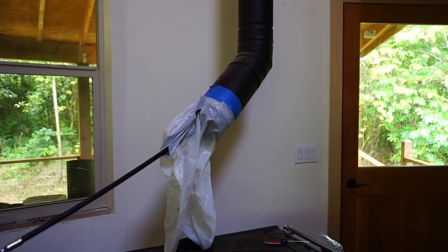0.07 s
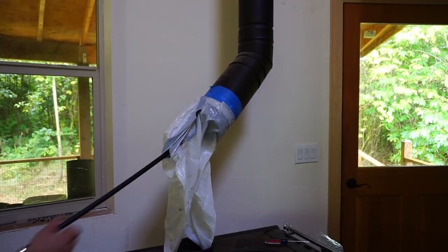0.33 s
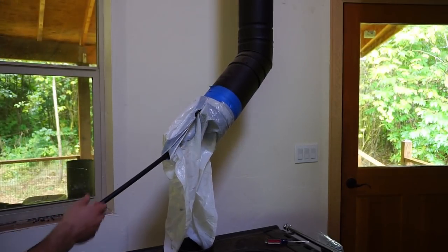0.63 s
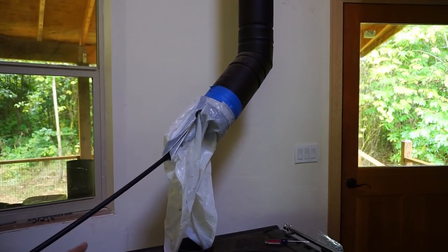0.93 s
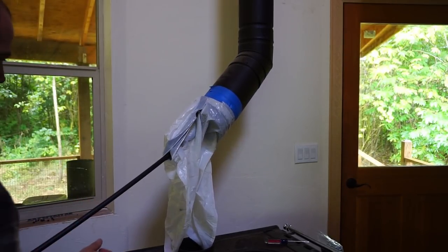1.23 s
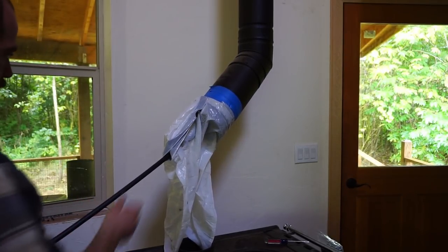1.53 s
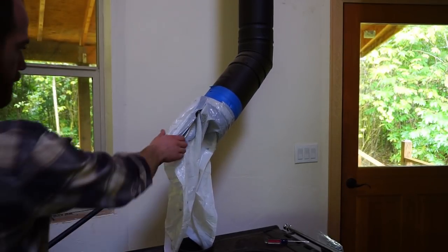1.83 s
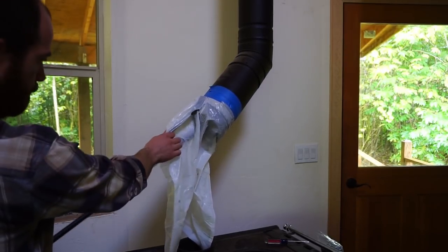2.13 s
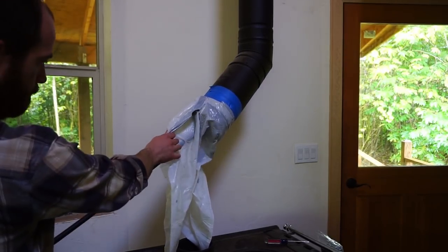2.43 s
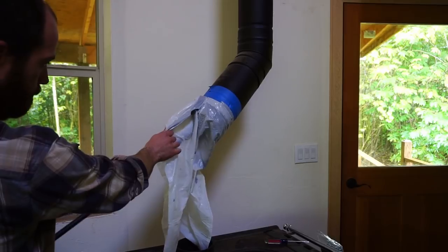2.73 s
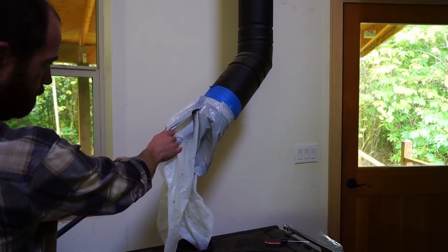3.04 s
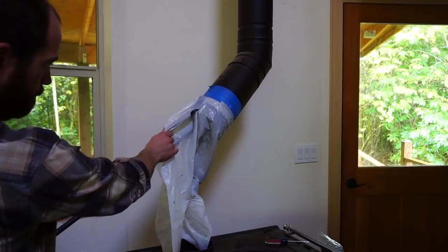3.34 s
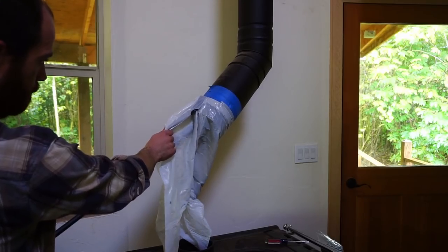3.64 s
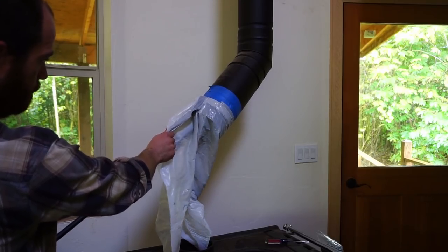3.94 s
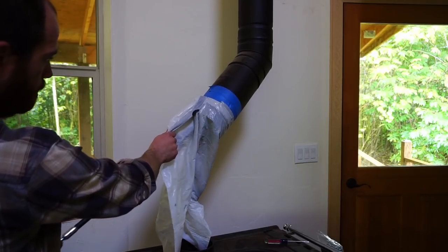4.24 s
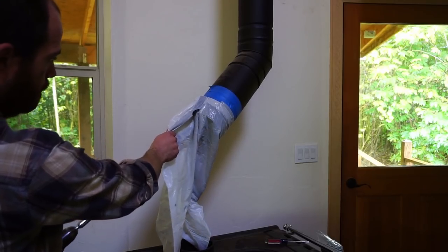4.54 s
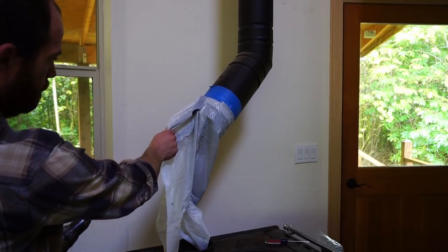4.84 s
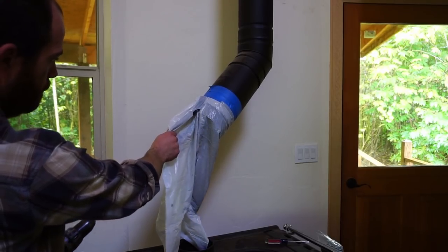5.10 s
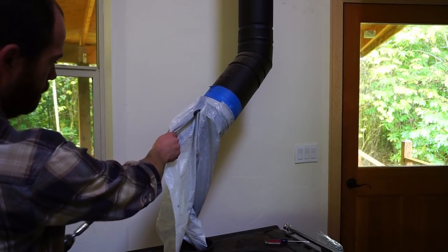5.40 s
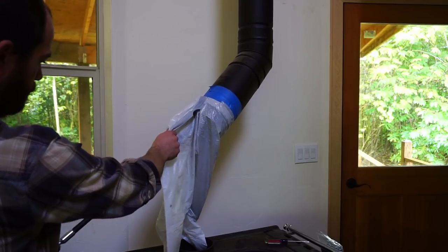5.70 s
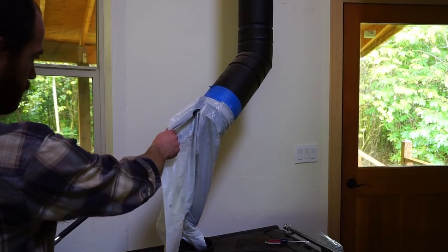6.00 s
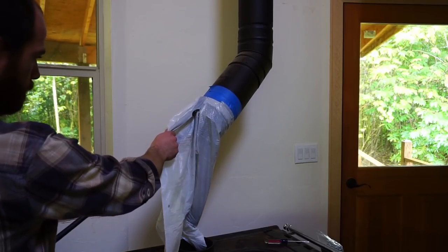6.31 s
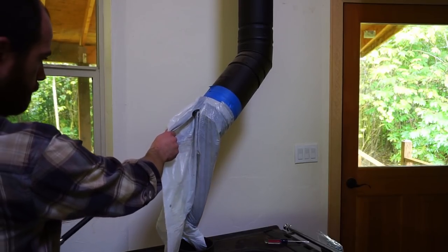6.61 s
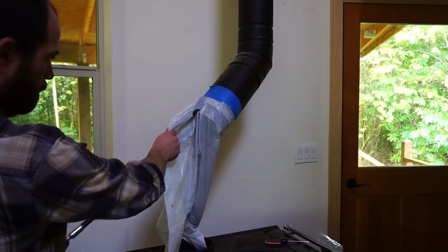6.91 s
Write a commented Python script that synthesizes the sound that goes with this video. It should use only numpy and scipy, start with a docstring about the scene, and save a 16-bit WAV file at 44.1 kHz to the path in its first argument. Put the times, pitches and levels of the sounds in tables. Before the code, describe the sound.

In a small, slightly echoing room, a plastic bag crinkles and stiff bristles give quick, irregular scrapes inside a metal stovepipe, with some soft, low knocks from the rod. Then steady brushing takes over: a grainy, faintly metallic hiss as soot runs down into the bag. It falters twice early on and later twice thins to a finer trickle. The microphone is fairly close.

```python
"""Sweeping a stovepipe

A chimney brush on a rod works inside a steel stovepipe taped into a plastic bag, in a small hard room.
The rod is jostled: bristles scrape in short bursts, the bag crackles, a few dull knocks sound.
Then the brush scours steadily and loosened soot hisses down into the bag, twice thinning to a trickle.
Scrapes, crackle and hiss are swarms of tiny impacts, coloured by the resonances of the pipe."""
import sys
import numpy as np
from scipy import signal
from scipy.fft import rfft, irfft, next_fast_len
from scipy.io import wavfile

SR = 44100
rng = np.random.default_rng(int(sys.argv[2]) if len(sys.argv) > 2 else 0)


def unload_audio(sound):
    """Save the sound as a 16-bit wav file, at the path given as the first command line argument."""
    columns = np.transpose(np.atleast_2d(sound))
    # keep every value between -1 and 1, then stretch to whole-number steps
    steps = np.round(np.clip(columns, -1, 1) * 32767)
    wavfile.write(sys.argv[1], SR, steps.astype(np.int16))


N = 306936
TIME = np.arange(N) / SR
SIZE = next_fast_len(N + SR, True)
HZ = np.fft.rfftfreq(SIZE, 1 / SR)


def amp(db):
    """Decibels to gain."""
    return 10 ** (np.asarray(db) / 20)


def unit(x):
    """Scales each row to rms 1."""
    return x / np.sqrt(np.mean(x ** 2, -1, keepdims=True) + 1e-20)


def read(points, hz):
    """Reads a curve on a log-frequency axis."""
    freqs, values = np.transpose(points)
    return np.interp(np.log(hz + 1), np.log(freqs), values)


def shape(x, response):
    """Filters by a frequency response."""
    return irfft(rfft(x, SIZE) * response, SIZE)[..., :N]


def decay(age, t60):
    """A fall of 60 dB every t60 seconds."""
    return np.exp(-np.log(1000) * age / t60)


def swell(start, rise, hold, settle_db_per_s):
    """A smooth rise, a hold, then a steady fall in decibels."""
    age = TIME - start
    attack = np.sin(np.pi / 2 * np.clip(age / max(rise, .001), 0, 1)) ** 2
    return attack * amp(-settle_db_per_s * np.maximum(age - rise - hold, 0))


def clumps(rate_hz, depth_db):
    """Random swelling of a stream of grains."""
    wander = unit(shape(rng.standard_normal(N), 1 / (1 + (HZ / rate_hz) ** 2)))
    return amp(depth_db * wander)


# Stereo image. Each row: frequency in Hz, left-right correlation.
STEREO_LIKENESS = [(60, 0.79), (300, 0.76), (700, 0.86), (1400, 0.62), (3000, 0.38), (15000, 0.31)]

def airy_noise():
    """Stereo noise among many reflections: alike in the bass, unlike in the treble."""
    left, other = rng.standard_normal((2, N))
    same = read(STEREO_LIKENESS, HZ)
    right = shape(left, same) + shape(other, np.sqrt(1 - same ** 2))
    return np.array([left, right])


def grains(colour, per_s, spread_db, ring_s=0.0044, coarse_hz=1300, fine_hz=5500):
    """Tiny impacts, each a puff of noise, in three stereo bands: coarse (low), medium and fine (high)."""
    size = amp(spread_db * np.minimum(rng.exponential(1, N), 4))
    hits = rng.random(N) < per_s / SR
    power = signal.lfilter([1], [1, -np.exp(-1 / (ring_s * SR))], size ** 2 * hits)
    puffs = unit(np.sqrt(power) * airy_noise())
    below_coarse, below_fine = (1 / (1 + (HZ / edge) ** 6) for edge in (coarse_hz, fine_hz))
    bands = np.array([below_coarse, below_fine - below_coarse, 1 - below_fine])
    gain = amp(read(colour, HZ))
    response = bands * gain / np.sqrt(np.mean(bands * gain ** 2, -1, keepdims=True))
    return shape(puffs[:, None], response)


def strengths(level, coarse, fine):
    """Gains of the three grain bands; the coarse and fine shares are in dB against the medium level."""
    return amp([level + coarse, level, level + fine]).reshape(3, -1)


# Colour of the room tone. Each row: frequency in Hz, relative level in dB.
ROOM_TONE_COLOUR = [(20, 4.5), (60, -3), (100, -5), (200, -16), (1000, -7), (15000, -25)]

def room_tone(level_db=-77):
    """Faint steady background of the room."""
    return amp(level_db) * unit(shape(rng.standard_normal((2, N)), amp(read(ROOM_TONE_COLOUR, HZ))))


# Length of the reverb tail. Each row: frequency in Hz, seconds to fall 60 dB.
ROOM_DECAY = [(100, 0.65), (400, 0.81), (1500, 0.52), (4000, 0.43), (9000, 0.24), (15000, 0.27)]

def room(x, tail_db=-13, walls_db=-14):
    """Nearby walls add a quick flurry of echoes, the small room a tail that dies sooner in the treble."""
    hz, age, spectrum = signal.stft(airy_noise()[:, :SR], SR, nperseg=256)
    dying = spectrum * decay(age, read(ROOM_DECAY, hz)[:, None])
    tail = signal.istft(dying, SR, nperseg=256)[1][:, :SR]
    flurry = airy_noise()[:, :SR] * np.exp(-TIME[:SR] / .014) * (TIME[:SR] > .003)
    walls = amp(walls_db) * flurry / np.linalg.norm(flurry[0])
    echoes = walls + amp(tail_db) * tail / np.linalg.norm(tail[0])
    return x + signal.oaconvolve(x, echoes, axes=1)[:, :N]


# Dull thuds. Each row: start in seconds, level in dB, band centre in Hz, seconds to fall 60 dB.
DULL_KNOCKS = [(0.115, -59, 65, .2), (0.479, -30.5, 330, 0.33), (0.505, -46, 242, 0.28),
               (0.585, -52, 200, 1), (0.765, -40, 800, 0.46), (0.79, -44, 155, 0.31), (0.96, -63, 70, .15),
               (1.49, -62, 282, 0.22), (1.97, -52.5, 282, 1.15)]

def knocks(rise_s=0.012, relative_width=0.42):
    """Soft blows, each a short low band of noise."""
    out = np.zeros((2, N))
    noise = airy_noise()
    for start, db, hz, t60 in DULL_KNOCKS:
        age = np.maximum(TIME - start, 0)
        body = unit(shape(noise, 1 / (1 + ((HZ - hz) / (relative_width * hz)) ** 2) ** 2))
        out += amp(db) * body * (1 - np.exp(-age / rise_s)) * decay(age, t60)
    return out


# Colour of bag and bristles, in rustle and scrapes. Each row: frequency in Hz, relative level in dB.
CRACKLE_COLOUR = [(60, -58), (130, -38), (220, -31.5), (330, -15), (600, -6.5), (1000, -3), (2300, -2),
                  (4400, -3), (7100, -6.5), (10900, -6), (15600, -12.5)]
# Pushes of the rod, each stirring a rustle.
# Each row: start, rise and hold in seconds, fall in dB per second, relative level and fine share in dB.
ROD_PUSHES = [(0.0, 0.001, 0.003, 450, -18, 1), (0.0, 0.016, 0.12, 100, -23.5, -0.5),
              (0.091, .03, 0.089, 79, -17.5, -2.5), (0.416, .04, .02, 100, -28.5, 0.5),
              (0.482, 0.023, 0.084, 97.5, -19, -6), (0.7, .06, 0.086, 202, -37, -1.5),
              (0.894, 0.034, 0.0054, 450, -24, -2), (0.95, 0.014, 0.0083, 182, -19.5, -2),
              (0.958, .03, 0.061, 698, -23, -5), (1.17, 0.022, 0.033, 81, -35, -6),
              (1.247, .02, 0.16, 148, -49.5, 8), (1.42, 0.044, 0.0045, 130, -25.5, -7),
              (1.679, 0.034, 0.054, 146, -35.5, -1.5), (1.79, 0.037, .02, 60, -26.5, -4)]

def rustle(level_db=-1, coarse_db=-9.5, held_still_s=2.46):
    """Bag and bristles crinkle faintly until the bag is held still, and louder with each push."""
    faint = strengths(level=-44, coarse=coarse_db, fine=1.5) * swell(0, 0, held_still_s, 46)
    power = faint ** 2
    for *timing, db, fine in ROD_PUSHES:
        power += (strengths(db, coarse_db, fine) * swell(*timing)) ** 2
    crinkle = grains(CRACKLE_COLOUR, per_s=1300, spread_db=-1.5, ring_s=0.0038)
    crinkle *= clumps(rate_hz=37, depth_db=0.6)
    return amp(level_db) * (np.sqrt(power) * crinkle).sum(1)


# Short scrapes of bristles, rod and bag.
# Each row: start in seconds, relative level, coarse share and fine share in dB, seconds to fall 60 dB.
ROD_JOLTS = [(0.059, -12, -10, -9, 0.14), (0.1145, -7, -17, -16, 0.1), (0.1292, -6, -19, -0.5, 0.18),
             (0.1725, -10, -31, 0, 0.19), (0.2053, -6, -13, -7, 0.11), (0.262, -12.5, -8, -7, 0.14),
             (0.45, -21, -12, 3, 0.16), (0.475, -18.5, -0.5, 8, 0.075), (0.502, -6, -10, 0.5, 0.087),
             (0.541, -8.5, -12, -2.5, 0.16), (0.5873, -8.5, -15, -6.5, 0.14), (0.71, -21, -11, -5, 0.11),
             (0.868, -14.5, -16, -5, 0.14), (0.957, -5, -24, -2, 0.19), (0.9847, -8.5, -27, -19, 0.3),
             (1.1752, -20.5, -22, -5, 0.1), (1.201, -20, -30, -9, 0.086), (1.432, -18.5, -31, -8, 0.12),
             (1.451, -14, -24, -1.5, 0.074), (1.712, -19, -33, -7, 0.077), (1.8, -15.5, -24.5, -9, 0.11),
             (1.8287, -14.5, -25, -13, 0.11), (1.946, -10, -13, 1.5, 0.072)]

def scrapes(band_trim_db=(-4, -3.5, -3), snap=0.48, snap_s=0.0013, rise_s=0.0027):
    """Each jolt of the rod gives a brief snap, then a burst of crackle that thins out quickly."""
    power = np.zeros((3, N + SR))
    age = np.arange(SR // 2) / SR
    trim = amp(band_trim_db)[:, None]
    for start, db, coarse, fine, t60 in ROD_JOLTS:
        burst = (1 - np.exp(-age / rise_s)) * (decay(age, t60) + snap * np.exp(-age / snap_s))
        at = round(start * SR)
        power[:, at:at + len(age)] += (trim * strengths(db, coarse, fine) * burst) ** 2
    crackle = grains(CRACKLE_COLOUR, per_s=4400, spread_db=2.0, ring_s=0.00088)
    return (np.sqrt(power[:, :N]) * crackle).sum(1)


# Texture of the soot at full flow.
# Each row: time in seconds, relative level, coarse share and fine share in dB.
SOOT_TEXTURE = [(2.03, -18.5, -12.5, -3.5), (2.22, -17.5, -14, -3.5), (2.66, -20.0, -16.0, -0.5),
                (3.04, -20.5, -16, -1.5), (3.48, -19.5, -16.5, -1), (3.9, -20.5, -16, 1.0),
                (4.22, -25, -14.5, 5.5), (4.53, -25, -13, 7), (4.82, -21.5, -10, 1.0),
                (5.27, -21.5, -11, 0.5), (5.52, -24.5, -15, 6), (5.8, -24.5, -16.5, 6),
                (6.2, -21, -18.5, 1.5), (6.6, -20, -18, 1), (6.83, -25.5, -18.0, 5)]
# Bouts of scouring. Each row: start, rise and hold in seconds, fall in dB per second.
SCOURING_BOUTS = [(1.91, 0.069, 0.21, 53), (2.544, 0.065, 0.51, 130), (3.333, 0.11, 3.53, 120)]

def soot():
    """Level, coarse share and fine share of the soot at every moment, and how freely it flows."""
    times, *columns = np.transpose(SOOT_TEXTURE)
    level, coarse, fine = (np.interp(TIME, times, column) for column in columns)
    flow = sum(swell(*bout) for bout in SCOURING_BOUTS)
    return level, coarse, fine, flow


# Where flakes land: the filling bag, then the steel.
# Each row: band centre in Hz, half width in Hz, relative level in dB.
LANDING_BANDS = [(409, 100, -3.5), (2980, 530, 17.5)]

def patter(growth=3.18, trim_db=8):
    """Heavy flakes patter in the bag and on the steel, growing quickly as the soot gets coarser."""
    level, coarse, _, flow = soot()
    flakes = airy_noise() * clumps(rate_hz=60, depth_db=2.5)
    landing = sum(amp(db) * unit(shape(flakes, 1 / (1 + ((HZ - hz) / half_width) ** 4)))
                  for hz, half_width, db in LANDING_BANDS)
    return flow * amp(trim_db + level + growth * coarse) * landing


# Colour of the bright soot hiss. Each row: frequency in Hz, relative level in dB.
HISS_COLOUR = [(100, -62), (200, -46), (300, -44.5), (400, -21.5), (550, -13), (770, -8.5), (1100, -5),
               (1600, -1), (2300, 1.5), (4500, 1.5), (7000, -4.5), (10000, -2.5), (12500, -5.5),
               (15700, -10.5)]

def scouring(trim_db=0.5, coarse_lift_db=1, fine_lift_db=2):
    """Bristles and soot flakes strike the steel so densely that they merge into a hiss."""
    level, coarse, fine, flow = soot()
    hiss = grains(HISS_COLOUR, per_s=6500, spread_db=2.5) * clumps(rate_hz=19, depth_db=0.3)
    gains = strengths(level + trim_db, coarse + coarse_lift_db, fine + fine_lift_db)
    return flow * (gains * hiss).sum(1)


# Ring of the steel pipe. Each row: pitch in Hz, bandwidth in Hz, level in dB against the direct sound.
PIPE_RESONANCES = [(235, 10, 0), (327, 10, -4), (452, 14, -6), (511, 14, -6), (700, 50, -7), (785, 30, -7),
                   (960, 20, -10), (1101, 16, -2), (1543, 16, -8), (2345, 50, -12), (3116, 30, -11),
                   (3599, 30, -14), (4815, 30, -14), (4931, 25, -12), (9853, 110, -9)]

def pipe(x):
    """The pipe adds its narrow resonances to whatever scrapes it."""
    ring = sum(amp(db) / (1 + 2j * (HZ - hz) / width) for hz, width, db in PIPE_RESONANCES)
    return shape(x, 1 + ring)


def scene():
    """Everything at the pipe sounds into the room."""
    brushing = pipe(scrapes() + rustle() + scouring())
    return room(brushing + patter() + knocks()) + room_tone()


# Stereo tilt. Each row: frequency in Hz, left minus right in dB.
PORT_BALANCE = [(60, -3), (110, -1), (200, 0), (380, -0.5), (700, -0.5), (1290, -2.5), (2380, -3.5),
                (4400, -0.5), (8120, -0.5), (15000, -4)]
# Stereo phase. Each row: frequency in Hz, lead of the left port in radians.
PORT_PHASE = [(100, 0.078), (950, 0.57), (2240, 0.48), (4000, 0.93), (6000, 1), (10000, 0.41),
              (15000, 0.28)]

def record(dry, mic_top_hz=17000, band_limit_hz=15770):
    """Two microphone ports of slightly different colour and phase, full-scale clipping, a band limit."""
    side = np.array([[.5], [-.5]])
    balance = amp(side * read(PORT_BALANCE, HZ))
    phase = np.exp(1j * side * read(PORT_PHASE, HZ))
    rolloff = 1 / (1 + (HZ / mic_top_hz) ** 60)
    heard = np.clip(shape(dry, rolloff * balance * phase), -1, 1)
    lowpass = signal.firwin(1023, band_limit_hz, window=("kaiser", 9), fs=SR)
    return signal.oaconvolve(heard, lowpass[None], "same", axes=1)


dry = scene()
out = record(dry)
unload_audio(out)
```